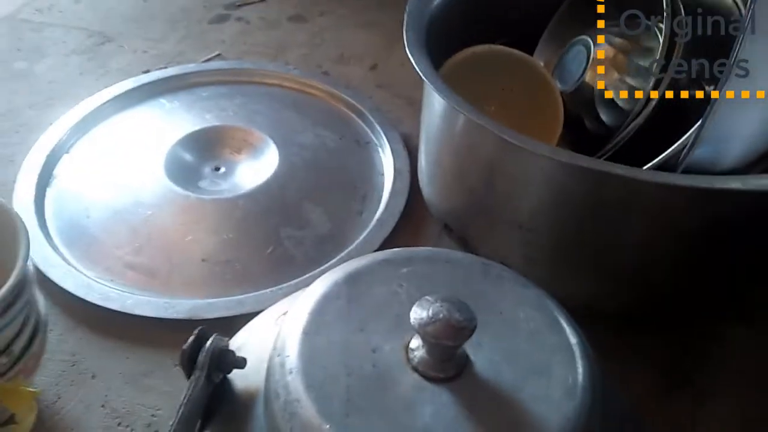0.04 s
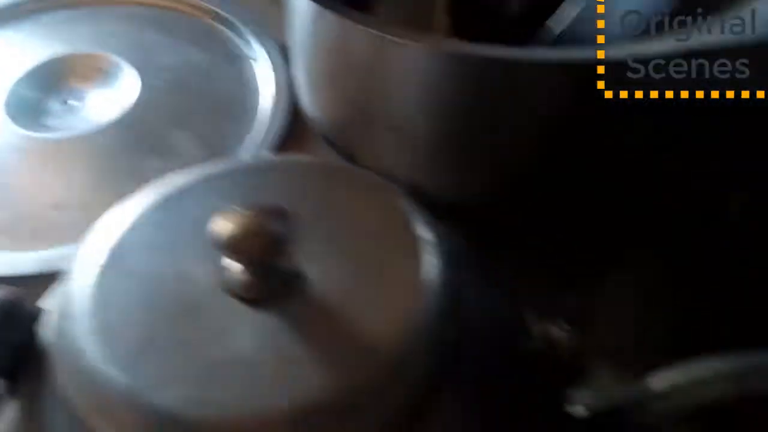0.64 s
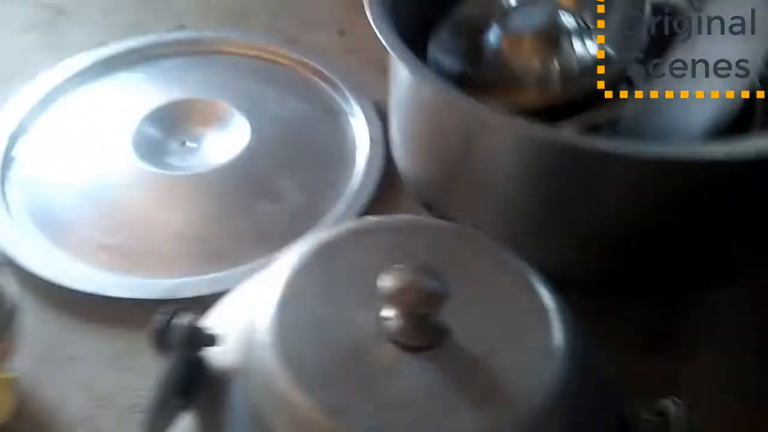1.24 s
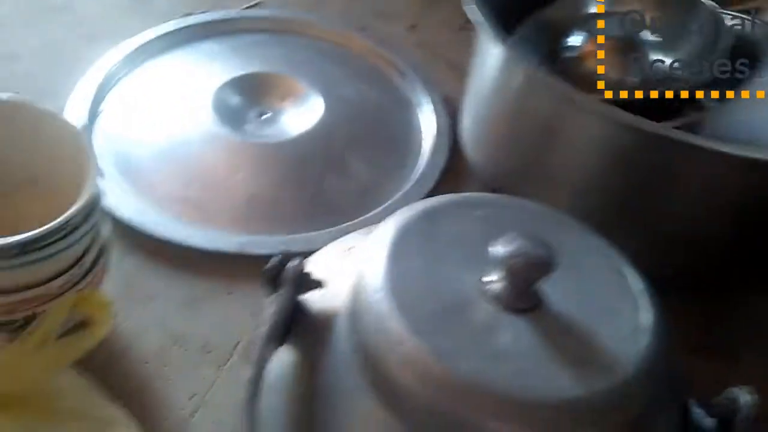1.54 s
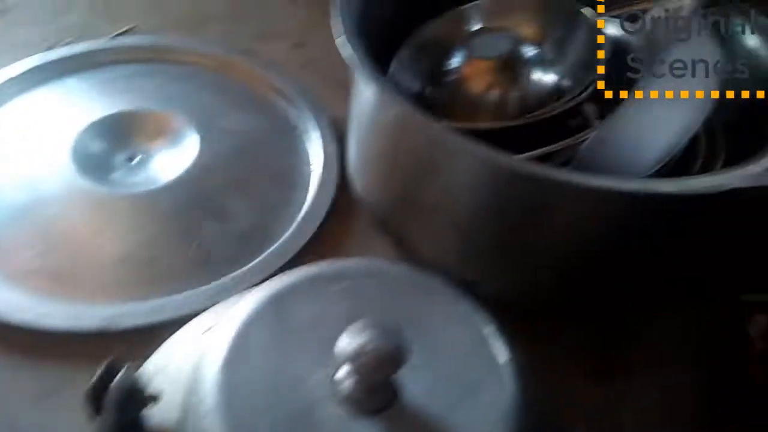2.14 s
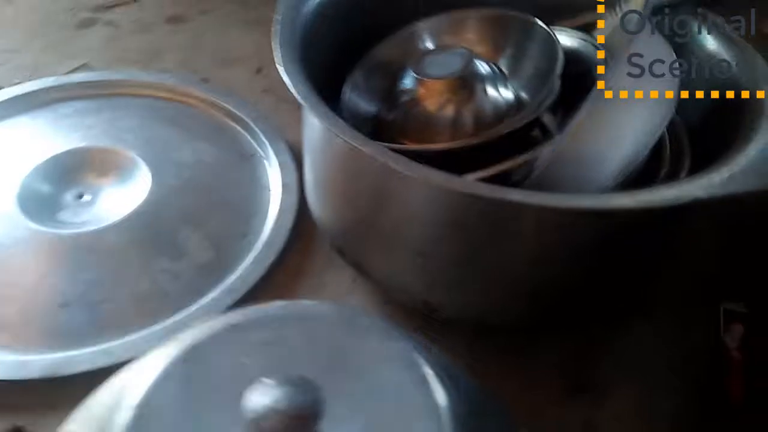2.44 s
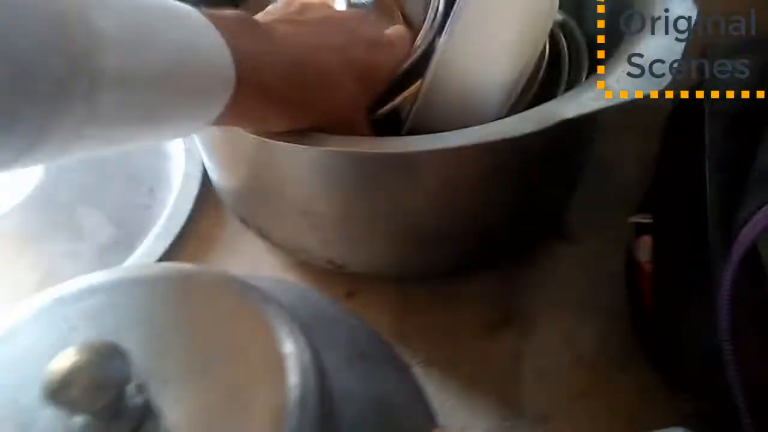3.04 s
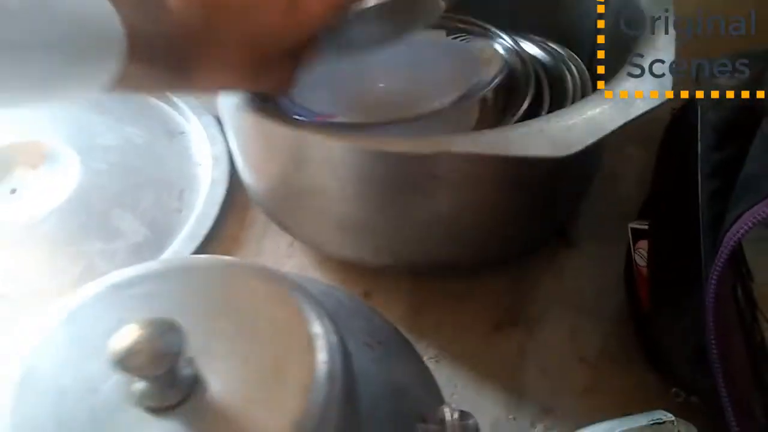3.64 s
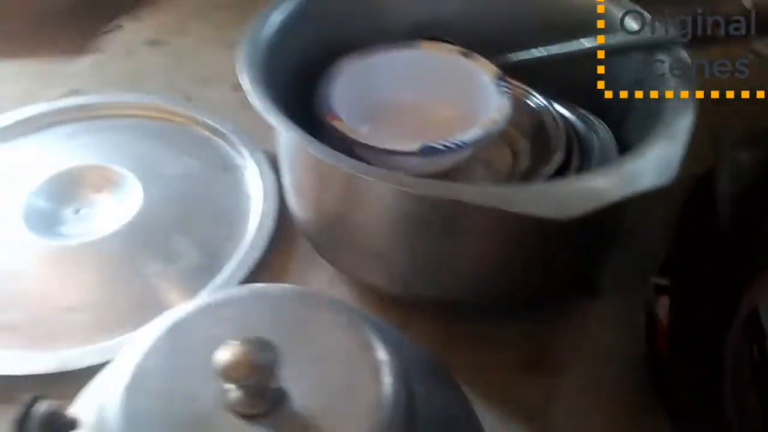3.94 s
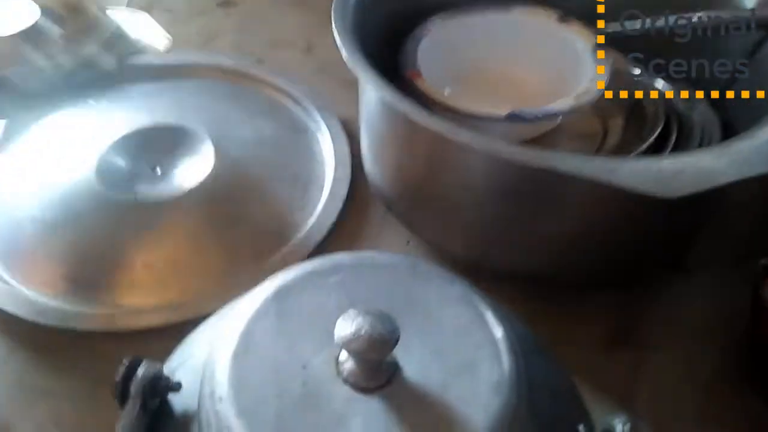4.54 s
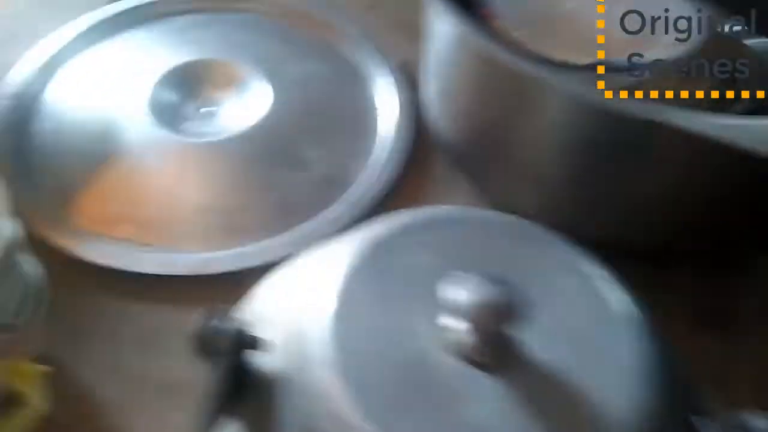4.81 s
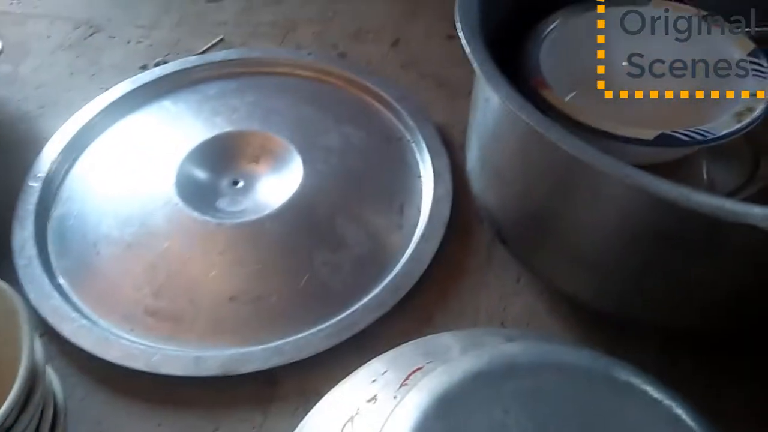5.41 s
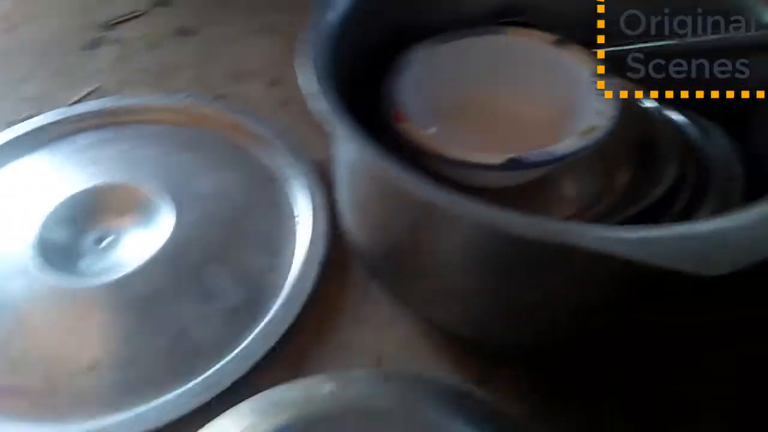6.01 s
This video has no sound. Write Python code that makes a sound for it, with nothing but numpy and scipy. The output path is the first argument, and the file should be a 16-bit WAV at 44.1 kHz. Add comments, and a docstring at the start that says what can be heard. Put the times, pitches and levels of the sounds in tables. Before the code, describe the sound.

Close metal dishes clatter in separate bursts in a small room. First a steel bowl rattles and settles, ringing softly. Plates then rasp and knock together inside a big pot, and a small bowl bounces with sharp clinks. A longer stretch of rummaging ends with one ringing plate. After a short lull with only faint hum and hiss, heavy clashes thump the pot and leave the dishes ringing.

```python
"""In a small room, steel plates and bowls are lifted out of a large aluminium pot.
A wide bowl rocks to rest while a rim sings on, and a small bowl drops and bounces with bright clinks.
The pile rasps as it slides and clashes inside the pot; heavy blows make the bottom of the pot boom.
Knocked metal rings at its own set of pitches, its "modes", and one lifted plate rings on.
A faint low hum and a soft hiss lie under the gaps."""
import sys
import numpy as np
from scipy import signal
from scipy.fft import rfft, irfft
from scipy.io import wavfile

SR = 44100
rng = np.random.default_rng(int(sys.argv[2]) if len(sys.argv) > 2 else 0)


def waveform_to_disk(signal):
    """Save audio, clipped to [-1, 1], as 16-bit WAV at the path in sys.argv[1]."""
    frames = np.transpose(np.atleast_2d(signal))
    scaled = np.clip(frames, -1, 1) * 32767
    samples = np.round(scaled).astype(np.int16)
    wavfile.write(sys.argv[1], SR, samples)


N = 276507
T = np.arange(SR) / SR  # one second of ringing
BODY_HZ, TREBLE_HZ = (20, 2800), (2800, 20000)  # the low and the high part of a sound

# Levels are relative: each source adds its own gain. A fade is the time taken to fall by 60 dB.
# tone of the hum, the room's hiss and the clatter of steel: f/Hz, level/dB
HUM_TONE = [(20, -33), (40, -24), (66, -10), (95, -7), (124, 3), (140, -4), (189, -25.5), (300, -31.5),
            (600, -73)]
HISS_TONE = [(100, -35.5), (250, -9.5), (500, -9), (720, -10.5), (950, -13.5), (4000, -25.5), (15000, -31)]
CLATTER_TONE = [(59, -50), (100, -25), (184, -32.5), (324, -7.5), (367, -21), (462, -6), (513, -14.5),
                (570, -4), (718, 0.5), (814, -5), (1240, -2.5), (3250, -12), (6350, -6.5), (13800, -26.5),
                (15000, -41.5)]
# the hum swells over its resting level: t/s, length/s, level/dB
HUM_SWELLS = [(0.434, 1.34, -58.5), (2.895, 5, -78.5), (5.285, 1.09, -67)]
# how long the room and the pile ring: f/Hz, fade/s
ROOM_FADES = [(200, 0.4), (1000, 0.35), (5000, 0.21), (14000, 0.23)]
PILE_FADES = [(200, 0.57), (600, 0.46), (1800, 0.54), (4000, 0.3), (8000, 0.36), (14000, 0.11)]
# modes of the pot, a free rim, the pile and the lifted plate: f/Hz, level/dB, fade/s
POT_MODES = [(237, -3, 0.17), (293, -4, 0.16), (332, 0, 0.15), (461, -5.5, .16)]
RIM_MODES = [(572, 0.5, 0.58), (867, -3, 0.36), (938, -0.5, 0.81), (1039, -12.5, 0.49), (1270, -10.5, 1.3),
             (1458, -12, 1.7), (1647, -6, 0.78), (1908, -11.5, 0.88), (2230, -15, 1.3), (2350, -4, .5),
             (2790, -13.5, 0.81)]
PILE_MODES = [(477, -11, .5), (622, -2, .45), (717, -3, .5), (890, -1, .3), (1210, -5, .45),
              (1565, -5, .35), (1626, -2, .4), (1750, -2, .5), (1836, -2, .6), (2213, -3, .6),
              (2385, -10, .5), (2606, -15, .5), (3435, -13, .5), (3553, -13, .5), (4334, -8, .35),
              (5436, -1, .28), (5612, -8, .35), (5905, -6, .35), (6212, -3, .35), (6482, -4, .35),
              (7146, -3, .25), (7823, -5, .22), (7918, -4, .22), (7966, -4, .22), (8320, -7, .22),
              (8524, -9, .22)]
PLATE_MODES = [(452, -22, .38), (711, -7, .42), (1225, 4, .41), (1368, -10, .4), (1535, -14, .35),
               (1640, -13, .35), (1822, -3, .52), (3155, -23, .3), (3545, -22, .38), (4210, -20, .55),
               (4745, -15, .36), (6223, -15, .32), (6717, -18, .28), (7280, -18, .26)]
# heavy blows that reach the bottom of the pot: t/s, level/dB
THUMPS = [(0.962, -45.5), (2.158, -53), (3.707, -44), (5.354, -40.5), (5.436, -44), (5.987, -54)]
# shoves and brushes that slide plates over each other: t/s, length/s, body level/dB, treble level/dB
SLIDES = [(0.807, 0.15, -40.5, -43.5), (0.931, 0.035, -19, -34), (1.012, 0.19, -21.5, -31.5),
          (1.219, 0.021, -26, -29.5), (1.279, 0.054, -33.5, -40.5), (1.366, 0.27, -57, -56),
          (1.731, 0.04, -40.5, -36), (2.882, 0.12, -40.5, -49.5), (3.001, 0.067, -27.5, -31.5),
          (3.167, 0.191, -30.5, -31), (3.367, 0.075, -22, -32.5), (3.464, 0.13, -39.5, -40),
          (3.571, 0.055, -30.5, -34), (3.64, 0.27, -43, -43), (3.848, 0.055, -33.5, -34.5),
          (3.918, 0.087, -65.5, -42.5), (4.562, 0.056, -71.5, -58.5), (5.06, 0.017, -81.5, -70.5),
          (5.302, 0.065, -52, -90), (5.634, 0.047, -22, -31), (5.819, 0.1, -43.5, -42),
          (5.888, 0.19, -21, -29.5)]
# pitches the bowls favour while they touch the pile: f/Hz, filter width/Hz, level/dB
WIDE_BOWL = [(836, 57, 0), (934, 110, -5.5), (1032, 43, 3), (2020, 910, -14), (2287, 43, -2.5),
             (3440, 200, -13), (4520, 630, -9), (4720, 200, -13.5), (6040, 110, -14.5), (7110, 340, -6),
             (7720, 250, -7.5), (11300, 880, -28.5)]
SMALL_BOWL = [(818, 86, 0.5), (1040, 120, -6.5), (1735, 260, -14.5), (1810, 24, -10), (2070, 20, -11),
              (3210, 130, -27), (3930, 460, -13.5), (4340, 120, -19), (4540, 170, 2.5), (5620, 83, -6),
              (6850, 600, -20), (7654, 230, -1.5), (10900, 320, -40.5)]
# the wide bowl rocks to rest, the small one bounces: t/s, body level/dB, treble level/dB
WIDE_CLINKS = [(0.0, -30, -48), (0.029, -26, -32.5), (0.049, -12, -18), (0.111, -13.5, -30),
               (0.118, -14.5, -18.5), (0.159, -32, -32), (0.175, -27.5, -38.5), (0.215, -27.5, -39),
               (0.241, -36, -28.5), (0.313, -41.5, -43.5), (0.393, -45, -58.5)]
SMALL_CLINKS = [(1.967, -33.5, -76.5), (2.165, -8.5, -12.5), (2.194, -25, -30.5), (2.298, -18, -21.5)]
# blows on the pile and on the lifted plate: t/s, body level/dB, treble level/dB, clack f/Hz
PILE_BLOWS = [(0.826, -26, -45, 564), (0.943, -16, -24.5, 644), (0.959, -9.5, -12, 907),
              (1.034, -13, -19.5, 638), (1.151, -17, -21, 758), (1.191, -14.5, -35, 992),
              (1.284, -20, -28, 783), (1.407, -31.5, -43.5, 1160), (1.526, -38.5, -38.5, 750),
              (1.744, -31.5, -33.5, 836), (2.899, -28.5, -41.5, 554), (2.916, -25, -28, 1260),
              (2.991, -16.5, -30, 1265), (3.018, -14, -14.5, 645), (3.106, -22, -29.5, 1278),
              (3.204, -16.5, -32.5, 673), (3.251, -20, -36, 1290), (3.301, -16.5, -23, 1330),
              (3.716, -13.5, -17.5, 1355), (3.728, -10.5, -19.5, 1418), (4.168, -44, -60, 638.5),
              (5.353, -9, -27, 834), (5.436, -14.5, -27, 805), (5.595, -23, -29.5, 855),
              (5.624, -15.5, -18, 1090), (5.634, -7.5, -16, 716), (5.671, -7, -17.5, 1186),
              (5.9, -9, -6, 960), (5.939, -22, -8, 1670), (5.989, -12.5, -17, 1150),
              (6.008, -14, -9.5, 1630)]
PLATE_BLOWS = [(2.155, -15.5, -39.5, 1508), (2.337, -22, -53.5, 1205), (3.369, -25.5, -39, 1120),
               (3.394, -12.5, -22, 1270), (3.407, -20.5, -32, 1715), (3.585, -22.5, -30, 1300),
               (4.256, -39, -48, 1050), (4.289, -21.5, -43, 691), (4.302, -16.5, -25.5, 1205)]
# dishes muffle each other; the pile rings more as the pot empties, the plate as it comes free:
# t/s, ring level/dB
PILE_FREEDOM = [(1.0, -12.5), (3.7, -8), (5.4, -8.5), (5.65, -1), (6.0, 3.5)]
PLATE_FREEDOM = [(3.4, -6), (4.3, 1.5)]


def amp(db):
    return 10 ** (np.asarray(db) / 20)


def evened(x, first=None):
    """Scales a sound to an average strength (rms) of 1, judged on all of it or on its first samples."""
    return x / np.sqrt(np.mean(x[:first] ** 2) + 1e-20)


def value_at(curve, hz):
    pitches, values = np.transpose(curve)
    return np.interp(np.log(hz + 1), np.log(pitches + 1), values)


def add(mix, start, sound):
    part = mix[max(round(start * SR), 0):][:len(sound)]
    part += sound[:len(part)]


def band(x, edges_hz, order=5):
    sections = signal.butter(order, np.clip(edges_hz, 1, SR / 2 - 1), "band", fs=SR, output="sos")
    return signal.sosfilt(sections, x)


def coloured(x, tone):
    """Shapes a sound to follow a tone table."""
    gains = amp(value_at(tone, np.fft.rfftfreq(len(x), 1 / SR)))
    return evened(irfft(rfft(x) * gains, len(x)))


def resonate(x, hz, width_hz, passes=1):
    """Lets through the sound near one pitch; each further pass narrows it."""
    for _ in range(passes):
        x = signal.lfilter(*signal.iirpeak(hz, max(hz / width_hz, 1), fs=SR), x)
    return x


def fade(fade_s):
    return np.exp(-np.log(1000) * T / max(fade_s, .002))


def fade_by_pitch(x, fades):
    """Every band of pitches dies away at its own speed."""
    hz, t, bands = signal.stft(x, SR, nperseg=256)
    gains = amp(-60 * t / value_at(fades, hz)[:, None])
    return signal.istft(bands * gains, SR, nperseg=256)[1][:len(x)]


def held(t, length, rise_s, fade_s):
    """A level that rises, holds and then fades."""
    return np.clip(t / rise_s, 0, 1) * np.exp(-np.log(1000) * np.maximum(t - length, 0) / fade_s)


def ring(modes, spread_db):
    """Struck metal rings; each point of contact shares its energy among the modes differently."""
    chance = rng.uniform(-1, 1, (len(modes), 2))
    tones = sum(amp(db + spread_db * share) * fade(fade_s) * np.sin(2 * np.pi * hz * T + np.pi * phase)
                for (hz, db, fade_s), (share, phase) in zip(modes, chance))
    return evened(tones, first=800)


def balanced(x, body_db, treble_db):
    """A heavy blow fills the body, a hard edge the treble."""
    body = evened(band(x, BODY_HZ), first=600)
    treble = evened(band(x, TREBLE_HZ), first=600)
    return amp(body_db) * body + amp(treble_db) * treble


def spot_colour(x, depth_db, step_hz=220):
    """Every spot on a rim favours its own patches of pitch."""
    hz = np.fft.rfftfreq(len(x), 1 / SR)
    patches = np.interp(hz, np.arange(128) * step_hz, rng.standard_normal(128))
    return evened(irfft(rfft(x) * amp(depth_db * patches), len(x)))


def hum_and_hiss(hum_db=-76, hiss_db=-81):
    """A low hum that swells now and then, and the faint hiss of the room."""
    t = np.arange(N) / SR
    swells = sum(amp(db) * held(t - start, length, rise_s=0.14, fade_s=0.28)
                 for start, length, db in HUM_SWELLS)
    hum = (amp(hum_db) + swells) * coloured(rng.standard_normal(N), HUM_TONE)
    return hum + amp(hiss_db) * coloured(rng.standard_normal(N), HISS_TONE)


def room(x, echo_db, echoes_per_s=4000):
    """Nearby walls send back a short, dense tail of echoes."""
    echoes = rng.choice([-1., 1.], SR) * (rng.random(SR) < echoes_per_s / SR) * (T > .005)
    tail = fade_by_pitch(echoes, ROOM_FADES)
    return x + amp(echo_db) * signal.oaconvolve(x, tail / np.linalg.norm(tail))[:N]


def pot_thumps(rise_s=0.0015):
    """The bottom of the pot booms briefly under heavy blows."""
    out = np.zeros(N)
    for start, db in THUMPS:
        add(out, start, amp(db) * ring(POT_MODES, spread_db=0) * (1 - np.exp(-T / rise_s)))
    return out


def singing_rim(level_db=-33.5):
    """A free rim sings on under the rocking bowl."""
    out = np.zeros(N)
    soft_ending = signal.windows.tukey(2 * SR, .2)[SR:]
    add(out, 0, amp(level_db) * ring(RIM_MODES, spread_db=-1.5) * soft_ending)
    return out


def pile_ring(weak_modes, modes, modes_db):
    """A few strong modes stand out over the many weak ones of the other plates."""
    phases = np.exp(2j * np.pi * rng.random(len(weak_modes)))
    crowd = coloured(irfft(weak_modes * phases, SR), CLATTER_TONE)
    crowd = evened(fade_by_pitch(crowd, PILE_FADES), first=800)
    return evened(crowd + amp(modes_db) * ring(modes, spread_db=6.5), first=800)


def jostle(nudges_per_s=300, uneven_db=4, sharpness=22):
    """Loose dishes nudge each other: low clacks and briefer high tinks, each spot at its own pitch."""
    pitches = np.concatenate([rng.uniform(550, 1900, 24), rng.uniform(2800, 8400, 24)])
    happens = rng.random(N) < nudges_per_s / SR
    nudges = happens * amp(uneven_db * np.minimum(rng.exponential(1, N), 3))
    spot = rng.integers(0, len(pitches), N)
    return evened(sum(resonate(nudges * (spot == k), hz, hz / sharpness) / hz
                      for k, hz in enumerate(pitches)))


def sliding(weak_modes, slips_per_s=500, uneven_db=1.5, catch_db=2, ring_db=-1, sag_db_per_s=21.5):
    """Tiny slips of uneven size rasp on the metal and keep the pile ringing while the dishes jostle."""
    slips = (rng.random(N) < slips_per_s / SR) * rng.choice([-1, 1], N)
    slips = slips * amp(uneven_db * np.minimum(rng.exponential(1, N), 4))
    catching = evened(band(rng.standard_normal(N), (15, 70), order=2))  # rims catch and let go
    rasp = (evened(slips) + 2.3 * rng.standard_normal(N)) * amp(catch_db * catching)
    ringing = signal.oaconvolve(rasp, pile_ring(weak_modes, PILE_MODES, modes_db=-3))[:N]
    scrape = coloured(rasp, CLATTER_TONE) + amp(ring_db) * evened(ringing) + 1.1 * jostle()
    body, treble, fizz = (evened(band(scrape, hz)) for hz in [BODY_HZ, (2800, 9200), (9200, 15000)])
    power = np.zeros((3, N))
    for start, length, low_db, high_db in SLIDES:
        # body, treble and fizz: level/dB, fade/s once the plates stop
        layers = [(low_db - 4.5, 0.3), (high_db - 4, 0.18), (high_db - 15, 0.087)]
        for track, (db, fade_s) in zip(power, layers):
            # a shove takes hold quickly and slackens as it goes
            shove = amp(db - sag_db_per_s * T) * held(T, length, rise_s=.025, fade_s=fade_s)
            add(track, start, shove ** 2)
    return (np.sqrt(power) * [body, treble, fizz]).sum(0)


def bowl_clinks(blows, bowl, body_db, treble_db, rise_s, chatter_s,
                knock_hz, knock_db, knock_width_hz, tick_db):
    """A bowl knocks and buzzes briefly against its neighbour, which also muffles it."""
    out = np.zeros(N)
    for start, low_db, high_db in blows:
        touch = spot_colour(rng.standard_normal(SR), depth_db=3)
        buzz = (touch * fade(chatter_s) * (1 - np.exp(-T / rise_s)))[:SR // 4]
        dull_db = low_db - high_db
        knock = (knock_hz, knock_width_hz, knock_db + .5 * dull_db)  # soft touches are mostly knock
        clink = sum(amp(db) * resonate(buzz, hz, width, passes=2) for hz, width, db in [*bowl, knock])
        tick = amp(tick_db) * band(buzz, (250, 9000), order=2)
        add(out, start, balanced(clink + tick, low_db + body_db, high_db + treble_db))
    return out


def plate_clashes(blows, weak_modes, modes, freedom, modes_db, body_db, treble_db,
                  clack_db, clack_width_hz, base_chatter_s, rise_s=0.00027):
    """Rims chatter for an instant with a hollow clack, then the metal rings on."""
    out = np.zeros(N)
    for start, low_db, high_db, clack_hz in blows:
        dull_db = low_db - high_db
        chatter_s = base_chatter_s * 2 ** min(dull_db / 9, .7)  # flat, dull blows chatter for longer
        contacts = rng.standard_normal(SR) * amp(0.7 * rng.standard_normal(SR))
        contacts = spot_colour(coloured(contacts, CLATTER_TONE), depth_db=4)
        clack = evened(resonate(rng.standard_normal(SR), clack_hz, clack_width_hz, passes=2))
        clack *= amp(clack_db + .5 * dull_db)  # dull blows are mostly clack
        strike = evened((contacts + clack) * fade(chatter_s), first=800)
        ring_db = np.interp(start, *np.transpose(freedom))
        ringing = amp(ring_db) * pile_ring(weak_modes, modes, modes_db)
        blow = (strike + ringing) * (1 - np.exp(-T / rise_s))
        add(out, start, balanced(blow, low_db + body_db, high_db + treble_db))
    return out


def scene():
    """Plates and bowls sound in one room; the pile keeps the same weak modes from blow to blow."""
    weak_modes = amp(8 * np.minimum(rng.standard_normal(SR // 2 + 1), 2))  # one strength for each Hz
    pile = plate_clashes(PILE_BLOWS, weak_modes, PILE_MODES, PILE_FREEDOM, modes_db=-3.5, body_db=-15,
                         treble_db=-9, clack_db=-1.5, clack_width_hz=140, base_chatter_s=0.12)
    plate = plate_clashes(PLATE_BLOWS, weak_modes, PLATE_MODES, PLATE_FREEDOM, modes_db=5.5,
                          body_db=-11.5, treble_db=-7, clack_db=8, clack_width_hz=86,
                          base_chatter_s=0.017)
    wide = bowl_clinks(WIDE_CLINKS, WIDE_BOWL, body_db=-14.5, treble_db=-4, rise_s=0.0037,
                       chatter_s=0.025, knock_hz=940, knock_db=-5.5, knock_width_hz=250, tick_db=-31)
    small = bowl_clinks(SMALL_CLINKS, SMALL_BOWL, body_db=-10, treble_db=-10.5, rise_s=0.0019,
                        chatter_s=0.043, knock_hz=912, knock_db=-1.5, knock_width_hz=140, tick_db=-31.5)
    plates_and_pot = room(pile + plate + pot_thumps(), echo_db=-10.5)
    bowls = room(wide + small, echo_db=-9.5)
    return plates_and_pot + bowls + sliding(weak_modes) + singing_rim() + hum_and_hiss()


def record(dry):
    """The loudest peaks are rounded off, then the very highest treble is cut away."""
    ceiling, top_hz = .55, 14850
    rounded = dry / (1 + (dry / ceiling) ** 4) ** (1 / 4)
    treble_cut = signal.firwin(511, top_hz, window=("kaiser", 9), fs=SR)
    return signal.oaconvolve(rounded, treble_cut, "same")[None]


dry = scene()
out = record(dry)
waveform_to_disk(out)
```